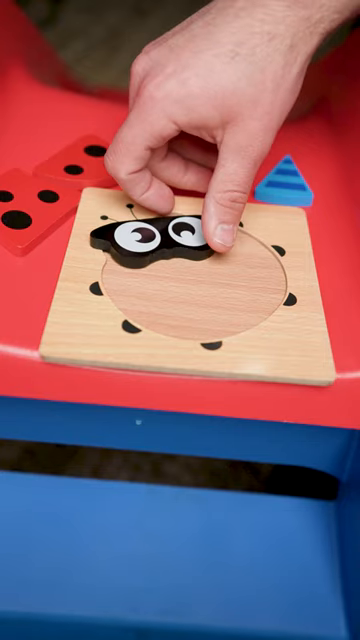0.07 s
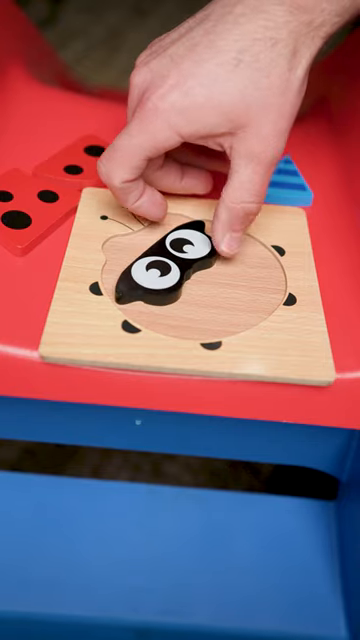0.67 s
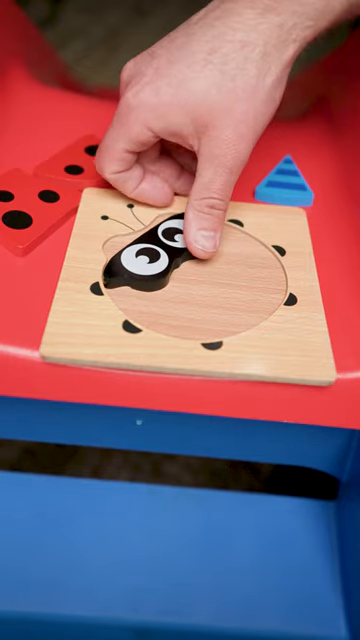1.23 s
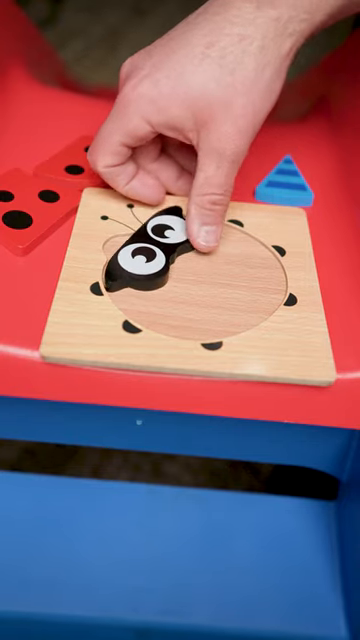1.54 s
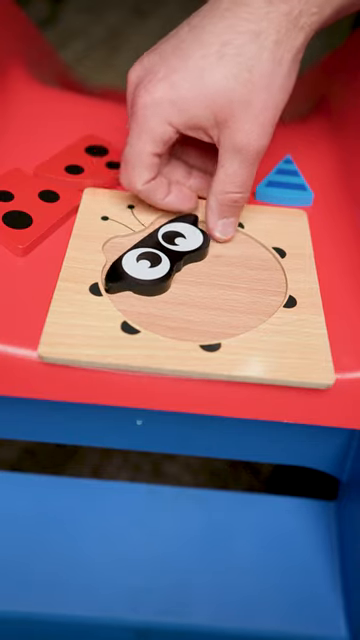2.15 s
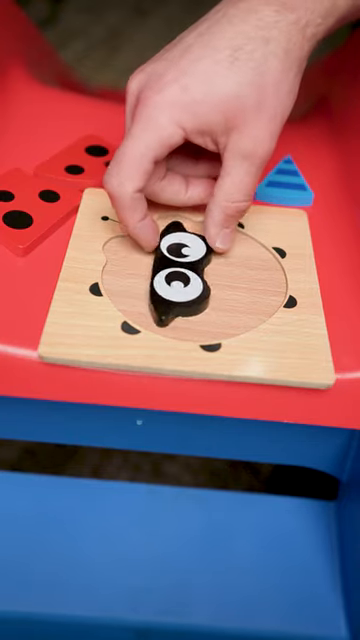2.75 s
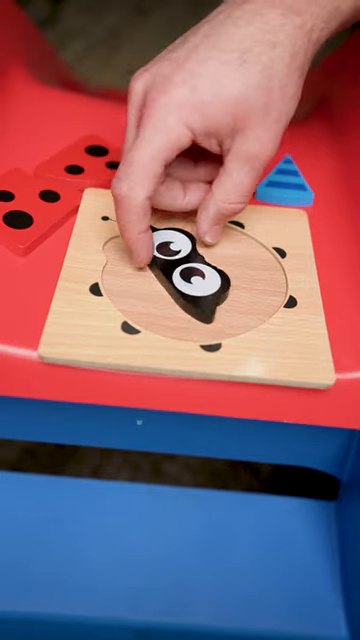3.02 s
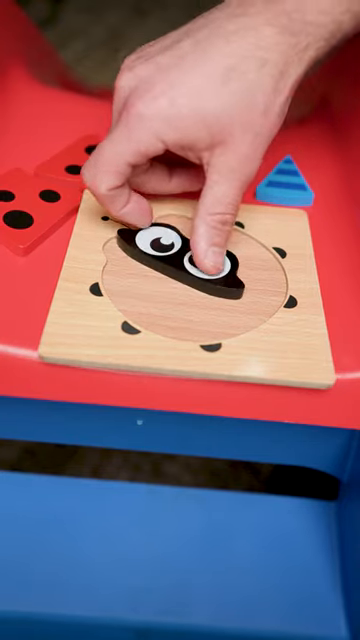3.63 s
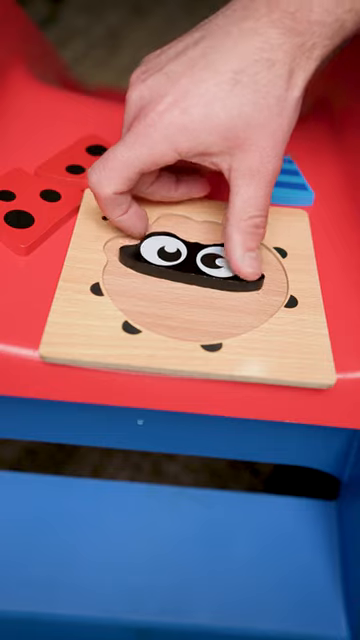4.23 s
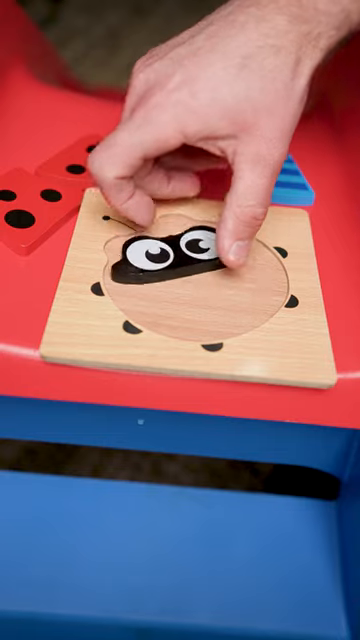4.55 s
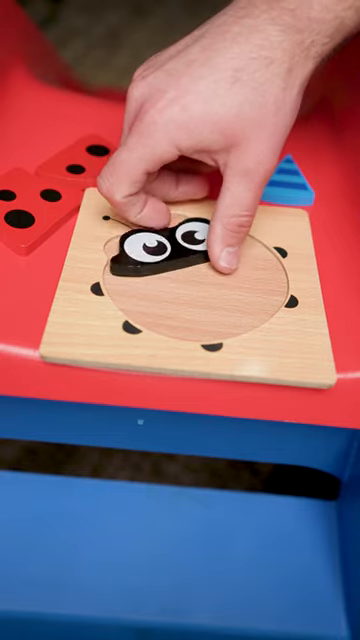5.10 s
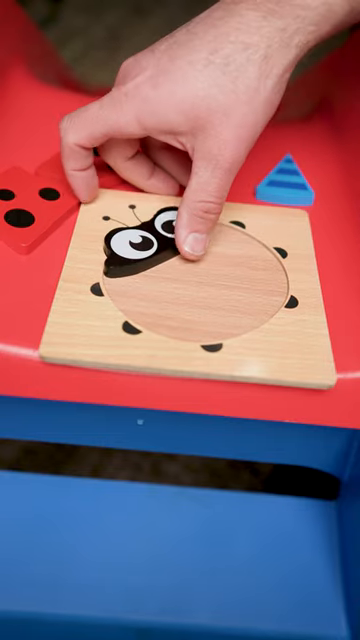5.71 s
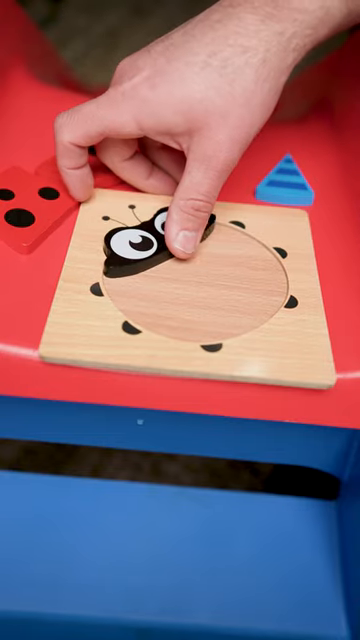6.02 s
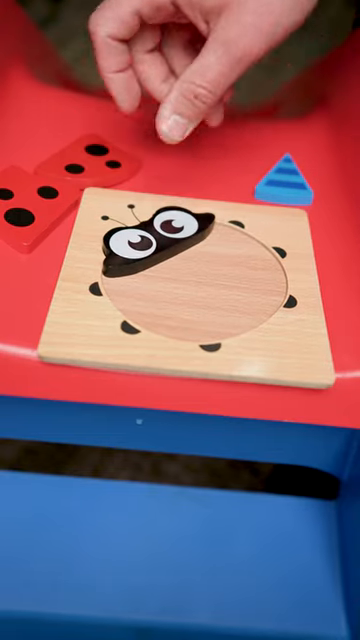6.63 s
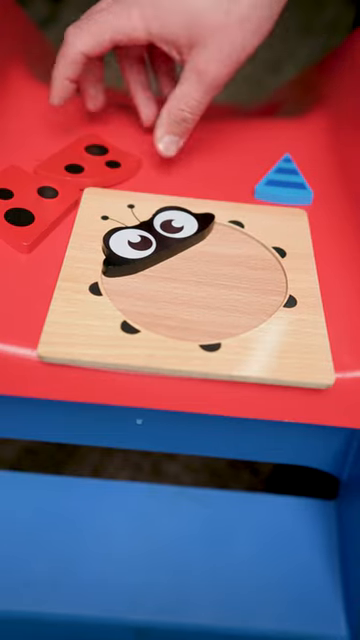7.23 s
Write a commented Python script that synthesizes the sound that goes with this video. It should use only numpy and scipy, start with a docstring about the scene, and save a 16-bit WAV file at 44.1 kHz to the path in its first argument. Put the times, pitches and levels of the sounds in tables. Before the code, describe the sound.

A wooden puzzle piece clacks against a wooden board right at the start, with a tiny squeak and a short scrape; the loudest knock falls at about 0.2 seconds. Light rubbing follows, with separate knocks near 0.9, 1.2 and 1.6 seconds. From 2.4 to 3.3 seconds the piece slides and turns with dry, grainy scrapes and a few taps. Softer taps come around 3.5 and 3.8, then more rubbing with brief squeaks from 3.9 to 5.4. A cluster of knocks between 5.3 and 6 seconds presses the piece into place, with short creaks and slight thumps from the hollow plastic table. A faint scrape follows at 6.6 and a soft hand swish at 7.3. Everything is close, in a small room with soft air noise, a faint low hum and a barely audible whine after 5.5 seconds.

```python
"""Wooden puzzle piece on a plywood board

A flat piece is pushed, turned and pressed into its recess; the board lies on a plastic table.
Sliding grain and small knocks ring the same short wood modes; at times the wood sticks and groans.
Downward blows also thump the table. A hand brushes past at the end. A phone listens from close by
in a small room with soft air noise, a low hum and, late on, a faint whine."""
import sys
import numpy as np
from scipy import signal
from scipy.fft import rfft, irfft
from scipy.io import wavfile
from scipy.ndimage import uniform_filter1d, map_coordinates

SR = 44100
rng = np.random.default_rng(int(sys.argv[2]) if len(sys.argv) > 2 else 0)


def bounce(signal):
    """Save signal as a 16-bit WAV file at the path given by the first command-line argument."""
    frames = np.transpose(np.atleast_2d(signal))
    limited = np.clip(frames, -1, 1)
    pcm = np.round(limited * 32767).astype(np.int16)
    wavfile.write(sys.argv[1], SR, pcm)


N = 320166
TIME_S = np.arange(N) / SR
RING_S = TIME_S[:SR // 3]

# modes of board and piece: f/Hz, peak/dB, t60/s
WOOD_MODES = [(429.8, 8.5, 0.16), (495, 5.5, 0.028), (710, -10.5, 0.063), (775.4, 6.5, 0.066),
              (865, 6.5, 0.031), (1085, 0.5, 0.032), (1162, -4, 0.053), (1286, -9.5, .022),
              (1426, -3, 0.036), (1603, -6.5, 0.06), (1656, -3.5, 0.034), (1835, -11.5, .02),
              (2052, -5, 0.021), (2310, -9, .014), (2560, -6.5, 0.035), (2755, -11, 0.013),
              (2990, -6.5, .015), (3410, -7, 0.0071), (3675, -7.5, 0.0076), (4036, -8, .008),
              (4670, -10, .005), (5105, -5, 0.0075), (5630, -7, 0.012), (5843, -12.5, .011),
              (7250, -11, 0.0039), (7830, -12, 0.0081), (8420, -16, 0.0054), (9400, -24, .005),
              (10600, -24.5, .005), (11230, -23, 0.0045)]
# modes of the hollow table: f/Hz, peak/dB, t60/s
TABLE_MODES = [(108.1, -13, 0.2), (137.4, 7.5, 0.13), (163, -4, 0.2), (182, 0.5, 0.1), (222.5, -2.5, 0.046),
               (247, -6.5, 0.38), (293, -9, 0.3), (407, 2, 0.11), (493, -9.5, 0.083), (542, -17.5, 0.12)]


def undb(db):
    """Decibels to gain."""
    return 10 ** (np.asarray(db) / 20)


def unit(x):
    """Scale to rms 1."""
    return x / np.sqrt(np.mean(x ** 2))


def steady(x):
    """Hold the running rms at 1; colour and quick grain stay free."""
    return x / np.sqrt(np.maximum(uniform_filter1d(x ** 2, 2000), 1e-18))


def curves(rows):
    """Columns of a timed table, interpolated per sample."""
    times_s, *columns = np.transpose(rows)
    return [np.interp(TIME_S, times_s, column) for column in columns]


def cut(x, hz, kind, order=2):
    """Butterworth filter."""
    sos = signal.butter(order, np.minimum(hz, SR / 2 - 1), kind, fs=SR, output="sos")
    return signal.sosfilt(sos, x)


def band(x, low_hz, high_hz):
    """Zero-phase band at steady level; neighbours join without a gap."""
    hz = np.arange(N // 2 + 1) * SR / N
    below_low, below_high = [1 / (1 + (hz / edge_hz) ** 10) for edge_hz in (low_hz, high_hz)]
    return steady(irfft(rfft(x) * (below_high - below_low), N))


def walk(rate_hz):
    """Smooth random curve, rms 1."""
    step = max(int(SR / rate_hz), 1)
    stairs = np.repeat(rng.standard_normal(N // step + 1), step)
    return unit(uniform_filter1d(stairs, step)[:N])


def tone(hz, waver_hz, rate_hz):
    """Sine of wavering pitch, rms 1."""
    return np.sqrt(2) * np.sin(2 * np.pi * np.cumsum(hz + waver_hz * walk(rate_hz)) / SR)


def add(out, start_s, sound):
    """Mix a sound in at start_s."""
    i = max(int(start_s * SR), 0)
    out[i:i + len(sound)] += sound[:max(N - i, 0)]


def resonate(x, hz, t60_s):
    """One mode, gain 1 at its centre."""
    radius = np.exp(-np.log(1000) / (t60_s * SR))
    angle = 2 * np.pi * hz / SR
    poles = [1, -2 * radius * np.cos(angle), radius ** 2]
    return signal.lfilter([2 * (1 - radius) * np.sin(angle)], poles, x)


def plate_response(modes, lowest_lag_s):
    """Impulse response of a plate; bending waves are slower at low pitch."""
    out = 0
    for hz, db, t60_s in modes:
        age_s = np.maximum(RING_S - lowest_lag_s * np.sqrt(modes[0][0] / hz), 0)
        decay = np.log(1000) / t60_s
        out += undb(db) * decay * np.exp(-decay * age_s) * np.sin(2 * np.pi * hz * age_s)
    return out


def air():
    """Soft indoor air noise, drifting in level."""
    spectrum = [(18, -61), (30, -47.5), (80, -7.5), (120, 0), (211, -7), (304, -14), (415, -13), (472, -16),
                (645, -16), (815, -19.5), (1690, -23), (2700, -33.5), (3410, -34), (4090, -37.5),
                (12200, -50), (15000, -63.5)]  # f/Hz, relative density/dB
    levels = [(0, -51.5), (.6, -58.5), (1.8, -55.5), (2.7, -58), (3.7, -58.5), (5.0, -56), (5.65, -51),
              (6.3, -55.5), (7.2, -54)]  # t/s, level/dB
    hz, db = np.transpose(spectrum)
    bins_hz = np.maximum(np.arange(N // 2 + 1) * SR / N, 1)
    colour = undb(np.interp(np.log(bins_hz), np.log(hz), db))
    noise = unit(irfft(rfft(rng.standard_normal(N)) * colour, N))
    return noise * undb(curves(levels)[0] + walk(4.4))


def hum():
    """Low hum, wavering in pitch and level."""
    levels = [(0, -89), (5.4, -69), (5.6, -52), (6.05, -54), (6.4, -68.5), (7.2, -60)]  # t/s, level/dB
    return tone(hz=214, waver_hz=4.5, rate_hz=16) * undb(curves(levels)[0] + 3.9 * walk(19))


def whine(start_s=5.56, rise_s=0.3):
    """Faint thin tones that fade in late."""
    partials = [(1373, -75), (3338, -81.5), (3424, -85)]  # f/Hz, level/dB
    tones = sum(undb(db) * tone(hz, waver_hz=4.26, rate_hz=30) for hz, db in partials)
    return tones * np.clip((TIME_S - start_s) / rise_s, 0, 1)


def room(x, gap_s=0.0079, rise_s=0.0032, split_hz=3300, linger_hz=2750):
    """Near walls return a short diffuse tail; one band lingers."""
    age_s = np.maximum(RING_S - gap_s, 0)
    onset = 1 - np.exp(-age_s / rise_s)
    tail = 0
    for kind, hz, db, t60_s in (("low", split_hz, -9.5, 0.21), ("high", split_hz, -15, 0.23),
                                ("bandpass", [linger_hz / 1.6, linger_hz * 1.5], -17, 0.29)):
        noise = rng.standard_normal(len(RING_S)) * onset * np.exp(-np.log(1000) * age_s / t60_s)
        tail += undb(db) * cut(noise / np.linalg.norm(noise), hz, kind, order=3)
    return x + signal.fftconvolve(x, tail)[:N]


def rustle(peak_s=7.26, half_s=0.036, hz=2730, db=-57.5):
    """Brief soft swish of the moving hand."""
    swish = unit(cut(rng.standard_normal(N), [hz / 1.16, hz * 1.07], "bandpass"))
    return undb(db) * swish * np.exp(-((TIME_S - peak_s) / half_s) ** 2)


def groans(waver=0.015, jitter=0.077, overtone_db=-23):
    """Wood sticks and slips at a nearly steady rate; fast squeaks come out rougher. A fingernail also gives one
    faint high tick."""
    # stick-slip bursts, plus one faint fingernail tick at 9.2 kHz near 3.47 s: peak t/s, half length/s,
    # pitch/Hz, level/dB
    bursts = [(.004, 0.011, 312, -36.5), (0.034, 0.016, 325, -46.5), (0.159, 0.0055, 763, -20.5),
              (2.078, 0.008, 807, -48.5), (2.105, 0.0068, 685, -41.5), (3.467, 0.0046, 9200, -61),
              (3.95, 0.012, 811, -29.5), (4.575, 0.0045, 813, -37), (4.677, 0.0037, 789, -31),
              (5.235, 0.0031, 840, -34), (5.464, 0.015, 422, -35.5), (5.641, 0.0039, 3930, -61),
              (5.683, 0.012, 408.6, -33), (5.885, 0.013, 413.6, -27.5), (5.886, 0.0043, 4230, -55.5),
              (6.052, 0.016, 691, -45.5), (6.087, 0.016, 420, -46)]
    out = np.zeros(N)
    warped_s = np.cumsum(1 + waver * walk(150) + jitter * walk(900)) / SR
    for peak_s, half_s, hz, db in bursts:
        near = np.abs(TIME_S - peak_s) < 4 * half_s
        phase = 2 * np.pi * hz * warped_s[near]
        wave = np.sin(phase) + undb(overtone_db) * np.sin(2 * phase)
        swell = np.exp(-((TIME_S[near] - peak_s) / half_s) ** 2)
        out[near] += np.sqrt(2) * undb(db) * swell * wave
    return out


def pushes(rumble_lag_s=0.00077):
    """Rumble, rasp and hiss gains: each push speeds up and comes to rest; the board rings up late."""
    # pushes: top-speed t/s, rise/s, fall/s, rumble/dB, rasp/dB re rumble, hiss/dB re rumble
    strokes = [(0.158, 0.038, 0.035, -29.5, -17.5, -31), (0.19, 0.022, 0.025, -30, -20, -22),
               (0.213, 0.019, 0.038, -32.5, -16, -8.5), (0.268, 0.032, 0.11, -33, -13, -34),
               (0.482, 0.082, 0.018, -56.5, -5.5, -5.5), (0.747, 0.15, 0.17, -60.5, -6, -16.5),
               (0.87, 0.018, 0.035, -43, -15.5, -13.5), (0.903, 0.039, 0.058, -45, -1.5, 2.5),
               (1.023, 0.068, 0.021, -37.5, -15.5, -12), (1.408, 0.034, 0.055, -48.5, -3, -7),
               (1.571, 0.045, 0.011, -36.5, -4.5, -4), (1.622, 0.018, 0.055, -40.5, -10.5, -32.5),
               (1.964, 0.11, 0.28, -58.5, -8.5, -10), (2.102, 0.083, 0.064, -55, -9, -3.5),
               (2.451, 0.048, 0.11, -47, -1, 0), (2.513, 0.083, 0.08, -36.5, -4.5, -4.5),
               (2.561, 0.0094, 0.083, -30, -5, -8.5), (2.826, 0.055, 0.061, -52, 6.5, 5),
               (2.866, 0.072, 0.11, -30.5, -4, -7.5), (2.943, 0.016, 0.041, -34.5, -7, -12.5),
               (3.079, 0.032, 0.062, -46, 0, -7.5), (3.128, 0.052, 0.12, -32, -2.5, -5),
               (3.178, 0.014, 0.11, -36, -7.5, -17), (3.95, 0.034, 0.059, -37.5, -2.5, -2.5),
               (4.077, 0.12, 0.04, -45.0, -0.5, 2), (4.336, 0.095, 0.24, -46, -3, 5.5),
               (4.475, 0.1, 0.19, -36.5, -2.5, -1.5), (4.597, 0.15, 0.15, -38.5, -11.5, -8),
               (4.787, 0.12, 0.1, -70.5, -14.5, 7.5), (5.15, 0.055, 0.06, -36, -6, -2),
               (5.283, 0.099, 0.083, -35, -12.5, -7), (5.368, 0.026, 0.12, -38.5, -12, -9),
               (5.519, 0.0093, 0.068, -44, -28, -13), (5.647, 0.054, 0.077, -47, -29.5, -21.5),
               (6.417, 0.015, 0.02, -58, -18.5, -15.5), (6.612, 0.067, 0.1, -58, -9.5, -12.5)]
    # gain ~ speed ** exponent: rumble, rasp, hiss
    exponents = (2.95, 2.54, 2.47)
    lags_s = (rumble_lag_s, 0, 0)
    power = np.zeros((3, N))
    for peak_s, rise_s, fall_s, db, rasp_db, hiss_db in strokes:
        age_s = TIME_S[:int((rise_s + fall_s) * SR)]
        speed = np.sin(np.pi * np.interp(age_s, [0, rise_s, rise_s + fall_s], [0, 0.5, 1]))
        for layer, over_db, lag_s, exponent in zip(power, (0, rasp_db, hiss_db), lags_s, exponents):
            add(layer, peak_s - rise_s + lag_s, (undb(db + over_db) * speed ** exponent) ** 2)
    return np.sqrt(power)


def sliding(catches_per_s=7000, grain_db=2, flutter_db=2, travel_db=5, detune=0.017,
            bending_below_hz=600, rasp_hz=1220, hiss_hz=3290):
    """Tiny catches in the grain shake the wood: the board rumbles, the edge rasps, the grain hisses."""
    # rubbing edge, two favoured bands: t/s, f1/Hz, gain1/dB, f2/Hz, gain2/dB, board bending/dB
    edges = [(.2, 3800, -4.5, 675, 11.5, 5), (.9, 5520, -0.5, 3200, -1, 8), (1.41, 3520, 9, 8600, -1, -13),
             (1.56, 3450, -2, 1875, 1, -4), (2.5, 5500, -0.5, 8850, -7.5, -6.5),
             (2.58, 4700, 2.5, 7700, -15, -0.5), (2.87, 2800, 3, 1350, -21, -1),
             (3.14, 2520, 3, 7790, 3, -0.5), (3.95, 3840, 1, 5300, 6, -22.5),
             (4.07, 3820, 4.5, 5240, -8, -13), (4.33, 3750, 12, 5650, 0, -14.5),
             (4.5, 5070, 4, 1970, -4, 5.5), (4.65, 3350, 5, 5900, -7, 1.5), (5.14, 3320, 6, 1150, -2, -6),
             (5.28, 3550, -1, 1130, -4, 0.5), (5.4, 5170, -7, 3430, 4, 3.5)]
    catches = (rng.random(N) < catches_per_s / SR) * rng.standard_normal(N)
    catches *= undb(grain_db * np.minimum(rng.exponential(size=N), 4))
    force = (unit(catches) + 0.86 * rng.standard_normal(N)) * undb(flutter_db * walk(220))
    bending_db = curves(edges)[-1]
    ringing = 0
    for hz, db, t60_s in WOOD_MODES:
        # the travelling contact drives each mode now more, now less
        drive_db = travel_db * walk(18) + bending_db * (hz < bending_below_hz)
        ringing += undb(db + drive_db) * resonate(force, hz, t60_s)
    # the shifting grip detunes the modes
    ringing = unit(map_coordinates(ringing, [np.cumsum(1 + detune * walk(8))], mode="mirror"))
    rubbed = ringing + undb(-20) * unit(cut(force, [500, 11000], "bandpass", order=4))
    # turning the piece fades from edge to edge
    wood = rubbed.copy()
    for (_, hz1, db1, hz2, db2, _), selector in zip(edges, np.eye(len(edges))):
        share = np.interp(TIME_S, np.array(edges)[:, 0], selector)
        for hz, db in ((hz1, db1), (hz2, db2)):
            wood += share * undb(db) * cut(rubbed, [hz / 1.06, hz * 1.06], "bandpass", order=1)
    table = steady(sum(undb(db) * resonate(force, hz, t60_s) for hz, db, t60_s in TABLE_MODES))
    rumble = band(wood, 362, rasp_hz) + undb(-16.5) * cut(table, 64, "high")
    rasp = band(wood, rasp_hz, hiss_hz)
    hiss = band(wood, hiss_hz, 12400)
    rumble_gain, rasp_gain, hiss_gain = pushes()
    return rumble_gain * rumble + rasp_gain * rasp + hiss_gain * hiss


def struck_spot(x, hz, gain_db):
    """Add the band that the struck spot drives best."""
    return x + undb(gain_db) * cut(x, [hz / 1.046, hz * 1.11], "bandpass", order=1)


def contact(blow, top_hz, low_hz, spot_hz, spot_db):
    """Colour a blow at constant energy: harder contact reaches higher, a flatter landing deeper."""
    blow = cut(struck_spot(blow, spot_hz, spot_db), top_hz, "low", order=3)
    blow = cut(blow, low_hz, "high", order=4)
    return blow / np.sqrt(np.sum(blow ** 2) / (0.0019 * SR))


def knocks(crack_db=-15, crack_s=0.0046, chatter_db=-13, chatter_s=0.0023, detune=0.045,
           tick_lead_s=0.00098, tick_hardness=4.5, table_rise_s=0.012):
    """The edge ticks, the face lands and rings the wood, then the table thumps."""
    # blows: t/s, level/dB, contact corner/Hz, low cut/Hz, spot f/Hz, spot gain/dB,
    # relative thump/dB, relative tick/dB, finger damping/(1/s)
    blows = [(0.1403, -11.5, 1200, 405, 1250, -1, -38, -26.5, 30),
             (0.2293, -11, 7500, 1100, 5500, 4, -45, -35, 470),
             (0.2312, -0.5, 1900, 370, 1160, 9, -38, -16, 35),
             (0.525, -37.5, 1530, 388, 417, 21.5, -27, -11.5, 10),
             (0.9173, -12, 2010, 406, 420, 3, -28, -24, 12),
             (1.0095, -20.5, 1470, 390, 802, -14, -22, -16, 15),
             (1.1735, -10.5, 470, 210, 225, 0.5, -19.5, -20, 40),
             (1.254, -30, 850, 385, 790, 13.5, -8, -26, 10),
             (1.5746, -6, 3100, 520, 2740, 2.5, -31, -31, 83),
             (1.579, -13, 1600, 460, 1400, 6, -42, -37, 25),
             (1.777, -39.5, 1294, 383, 830, 13.5, -18, -15, 10),
             (2.502, -20, 1500, 400, 825, 17, -18, -31, 20),
             (2.563, -16.5, 3830, 400, 2680, 19, -41, -25, 20),
             (2.566, -14, 750, 386, 413, 31, -41, -30, 10), (2.842, -13, 1210, 390, 713, 18, -31, -28, 28),
             (3.008, -26.5, 1100, 385, 710, 12, -21, -32, 20),
             (3.4615, -20, 874, 385, 747, 0, -16.5, -18, 11.4),
             (3.474, -23, 898, 385, 706, -14, -39.5, -21, 19),
             (3.831, -26.5, 700, 349, 770, 0.5, -11.5, -16, 15),
             (3.832, -35, 3030, 1190, 2900, 5, -45, -22, 40),
             (3.866, -40, 3300, 385, 2860, -7, -18, -7, 18),
             (4.2822, -29.5, 5040, 600, 3770, 21, -26, -24, 30),
             (4.634, -24, 1100, 385, 825, 28, -31, -24, 20),
             (4.726, -34, 9000, 700, 3900, 8, -11.5, -20, 30),
             (5.318, -20, 2890, 395, 2250, 3, -27, -27, 80),
             (5.3205, -12.5, 1260, 350, 1040, -7, -21, -24, 50),
             (5.348, -21, 1120, 385, 460, -14, -18, -16, 30),
             (5.4499, -21, 2400, 430, 2130, 7, -16, -25, 14),
             (5.5153, -7.5, 750, 348, 710, -13, -12.5, -41, 60),
             (5.5194, -17, 1390, 366, 2560, 6, -13.5, -21.5, 60),
             (5.673, -29.5, 1027, 385, 430, 1, -20, -18.5, 20),
             (5.9102, -30, 3230, 600, 3600, -4, -32, -40, 120),
             (5.913, -18.5, 1390, 495, 1140, 6, -26.5, -39, 35),
             (6.017, -31.5, 1006, 385, 680, 12, -8.5, -33, 10)]
    out = np.zeros(N)
    free_wood = plate_response(WOOD_MODES, lowest_lag_s=0.00047)
    free_wood /= np.abs(free_wood).max()
    table_onset = 1 - np.exp(-(RING_S / table_rise_s) ** 2)
    table = cut(plate_response(TABLE_MODES, lowest_lag_s=0.008) * table_onset, 61, "high")
    for start_s, db, top_hz, low_hz, spot_hz, spot_db, thump_db, tick_db, damping_per_s in blows:
        # each grip detunes the wood and shortens its ring
        warped_s = RING_S * (1 + detune * rng.standard_normal())
        wood = np.interp(warped_s, RING_S, free_wood) * np.exp(-damping_per_s * RING_S)
        # countless weak modes blur into a crack
        crack = cut(rng.standard_normal(len(RING_S)), [900, 8000], "bandpass")
        crack *= np.exp(-RING_S / crack_s)
        # the flat piece never lands all at once
        chatter = rng.standard_normal(len(RING_S)) * RING_S * np.exp(-RING_S / chatter_s)
        settle = signal.fftconvolve(wood, chatter / np.linalg.norm(chatter))[:len(RING_S)]
        blow = wood + undb(crack_db) * crack + undb(chatter_db) * settle
        tick = 0.41 * contact(blow, tick_hardness * top_hz, low_hz=990, spot_hz=4420, spot_db=-2)
        face = 0.5 * contact(blow, top_hz, low_hz, spot_hz, spot_db)
        thump = struck_spot(table, spot_hz, spot_db)
        thump /= np.abs(thump).max()
        add(out, start_s - tick_lead_s, undb(db + tick_db) * tick)
        add(out, start_s, undb(db) * (face + undb(thump_db) * thump))
    return out


def scene():
    """Wood and hand sounds in the room, over the background; mono."""
    handling = knocks() + sliding() + groans() + rustle()
    return (room(handling) + air() + hum() + whine())[None]


def record(dry, low_hz=100, top_hz=15650):
    """The phone thins the deep bass and cuts the top."""
    lowpass = signal.ellip(10, 0.2, 80, top_hz, fs=SR, output="sos")
    return signal.sosfilt(lowpass, cut(dry, low_hz, "high"))


dry = scene()
out = record(dry)
bounce(out)
```